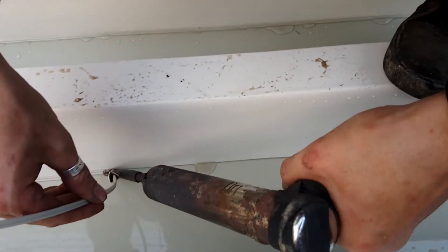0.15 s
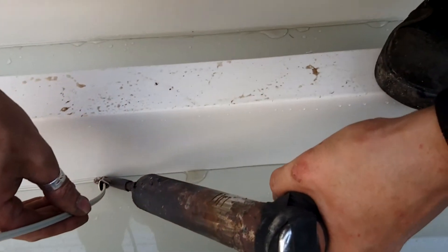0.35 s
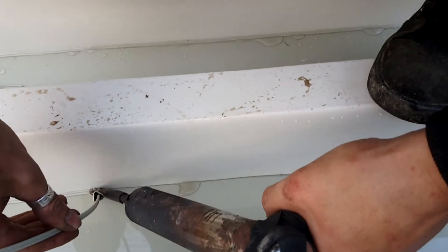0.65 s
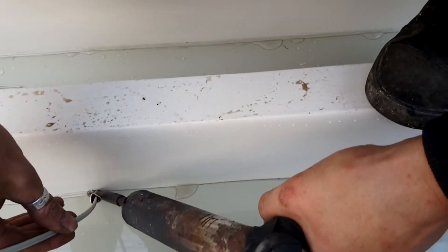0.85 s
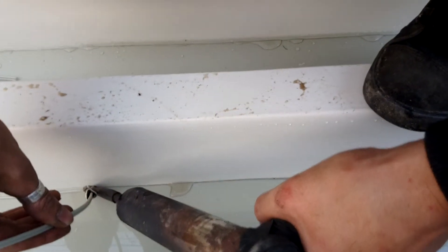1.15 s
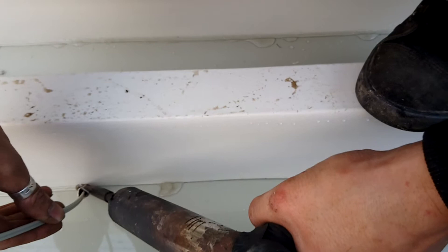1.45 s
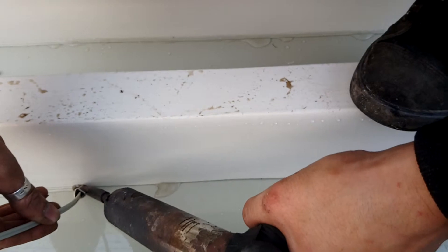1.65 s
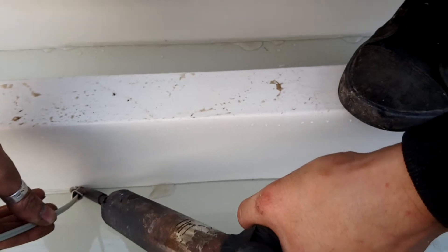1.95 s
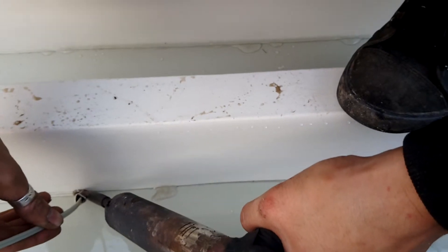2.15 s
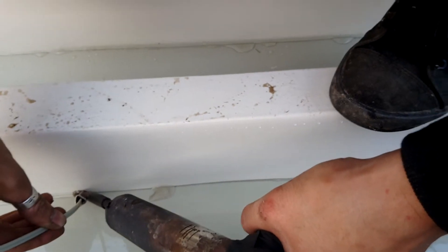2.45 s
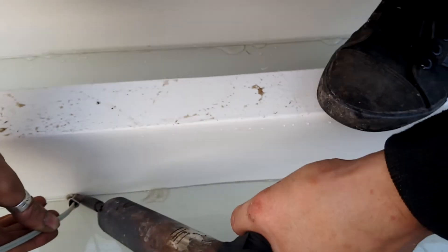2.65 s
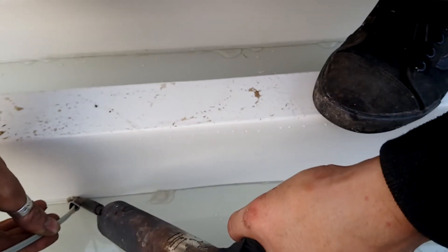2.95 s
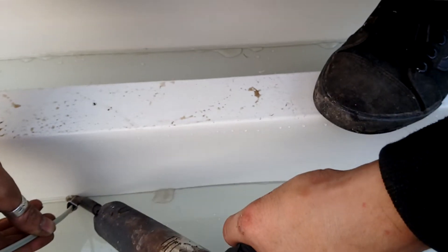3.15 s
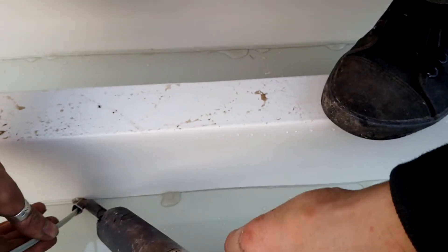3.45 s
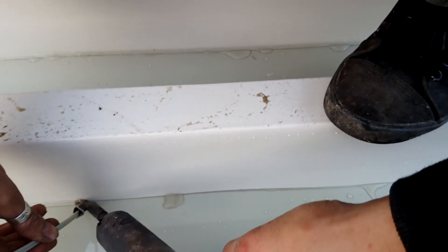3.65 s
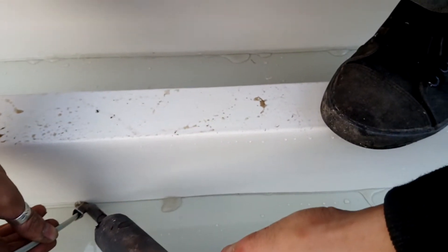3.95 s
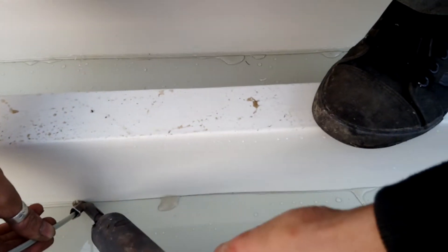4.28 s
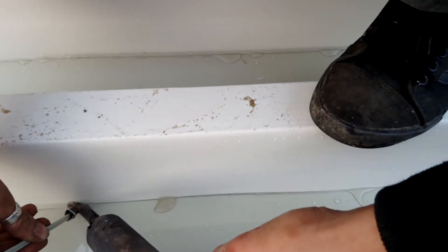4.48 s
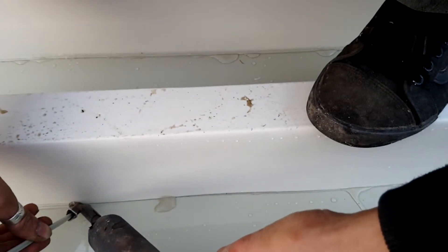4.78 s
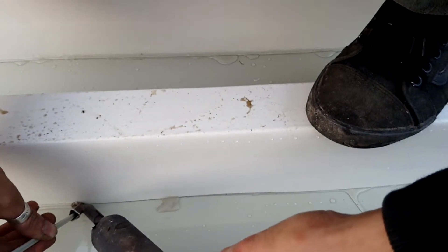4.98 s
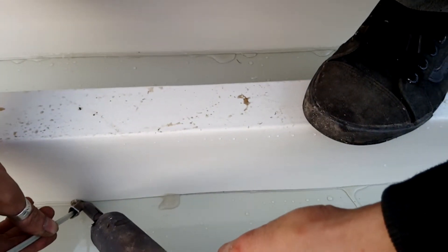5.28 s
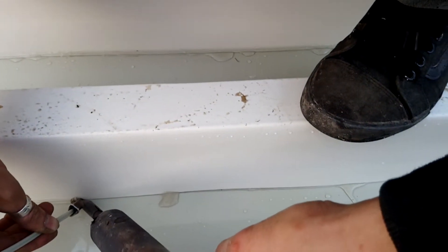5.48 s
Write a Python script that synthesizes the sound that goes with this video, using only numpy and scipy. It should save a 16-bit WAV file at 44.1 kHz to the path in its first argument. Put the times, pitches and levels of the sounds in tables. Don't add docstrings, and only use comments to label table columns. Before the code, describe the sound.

A hot-air welding gun blows a constant, bright, resonant hiss into a plastic corner, close and leaning left. Behind it a low air-supply rumble fills the workshop, with a blower hum strongest near one second. Soft dull knocks sound far off early and again near the end; brief low puffs of air touch the handheld camera midway. The stereo sound is slightly grainy, its extreme top cut.

```python
import sys
import numpy as np
from scipy import signal
from scipy.io import wavfile
from scipy.ndimage import uniform_filter1d

SR = 44100
rng = np.random.default_rng(int(sys.argv[2]) if len(sys.argv) > 2 else 0)


def amp(db):
    return 10 ** (np.asarray(db, float) / 20)


def write(x):
    x = np.atleast_2d(x).T
    wavfile.write(sys.argv[1], SR, np.round(np.clip(x, -1, 1) * 32767).astype(np.int16))


N = 247842


def at_hz(points, hz):
    table = np.array(points)
    return np.interp(np.log(hz + 1), np.log(table[:, 0]), table[:, 1])


def rumble():
    # (frequency [Hz], level [dB per Hz])
    colour = [(12, -50), (20, -17), (43, -18), (87, -7), (204, -2.5), (301, -3.5), (753, -8.5),
              (1020, -12.5), (1150, -13.5), (1500, -44), (2530, -120)]
    # (frequency [Hz], correlation [-1 to 1])
    likeness = [(30, .97), (70, 1), (130, 0.97), (290, 0.98), (500, 0.82), (800, 0.26), (1000, -0.2)]
    # (frequency [Hz], width [Hz], level [dB])
    duct = [(120, 11, 5.5), (158, 12, 2), (208.9, 6.3, 8.5), (289.4, 20, 5.5), (357, 5.9, 3.5),
            (411, 39, 3)]
    hz, _, z = signal.stft(rng.standard_normal((2, N)), SR, nperseg=8192)
    hz = hz[:, None]
    alike = np.clip(at_hz(likeness, hz), -1, 1)
    mid = np.sqrt(1 + alike) * z[0]
    side = np.sqrt(1 - alike) * z[1]
    colour_db = at_hz(colour, hz)
    for centre_hz, width_hz, db in duct:
        colour_db = colour_db + db / (1 + ((hz - centre_hz) / width_hz) ** 2)
    pair = np.array([mid + side, mid - side]) * amp(colour_db) * (hz < 1150)
    x = signal.istft(pair, SR, nperseg=8192)[1][:, :N]
    return amp(-36.82) * x / np.sqrt(np.mean(x ** 2))


def motor():
    turns_per_s = 48.78
    # (multiple of the turning rate, level [dB])
    partials = [(6, -60), (7, -57), (11, -62), (13, -61), (14, -65), (15, -62), (17, -63)]
    # (time [s], level [dB])
    hum_swell = [
        (0, -4.5),
        (.4, 4),
        (.8, 5),
        (1.25, 3.5),
        (1.5, 2),
        (3, -5.5),
        (4.5, -3),
        (5.62, -8),
    ]
    t, out = np.arange(N) / SR, np.zeros((2, N))
    swell_db = np.interp(t, *np.transpose(hum_swell))
    for k, db in partials:
        waver = np.interp(t, np.linspace(0, t[-1], num=24), rng.standard_normal(24))
        port_phase = max(k - 6, 0) * 0.2 * np.array([[0], [1]])
        phase = rng.uniform(0, 2 * np.pi) + port_phase + 0.36 * waver
        level = amp(db + 6.5 + swell_db + 2.5 * waver)
        out += level * np.sin(2 * np.pi * k * turns_per_s * t + phase)
    return out


def knocks():
    rise_s, t60_s, ring_width_hz = 0.048, 0.53, 40
    # (time [s], level [dB], pitch of the loudest part [Hz])
    blows = [
        (.3, -38.5, 604),
        (.65, -47.5, 700),
        (1.06, -46.5, 650),
        (1.55, -37.5, 526),
        (2.2, -36.5, 483),
        (4.98, -38, 530),
        (5.27, -38, 650),
        (5.56, -44, 550),
    ]
    # (frequency [Hz], level [dB])
    shop_modes = [(340, -2), (450, -1), (520, 3.5), (580, 1), (640, -3), (700, -15), (770, 1.5), (840, 1.5),
                  (900, 2), (970, -10), (1040, -3), (1120, -6)]
    t, out = np.arange(N) / SR, np.zeros((2, N))
    r = np.exp(-np.pi * ring_width_hz / SR)
    for hz, mode_db in shop_modes:
        swell = 1e-9
        for at, db, top_hz in blows:
            age = np.clip(t - at, 0, 1)
            tilt_db = -9.5 * np.log2(hz / top_hz) ** 2 + 2.2 * rng.standard_normal()
            decay = amp(db + tilt_db - 60 * age / t60_s)
            swell = swell + decay * np.minimum(age / rise_s, 1) * (age < 1)
        noise = rng.standard_normal((2, N))
        noise[1] = -0.1 * noise[0] + 1.08 * noise[1]
        ring = [1, -2 * r * np.cos(2 * np.pi * hz / SR), r * r]
        out += amp(mode_db + 24.5) * signal.lfilter([1 - r, 0, r - 1], ring, noise * swell)
    return out * amp([[-1.5], [1.5]])


def buffet():
    # (time [s], length [s], level [dB])
    puff_table = [
        (2.62, 0.18, -51),
        (2.997, 0.71, -57),
        (5.08, .4, -74),
    ]
    t = np.arange(N) / SR
    band = signal.butter(2, [35, 120], "band", fs=SR, output="sos")
    low = signal.sosfilt(band, rng.standard_normal((2, N)))
    level = amp(-70)
    for at, length, db in puff_table:
        level = level + amp(db) * np.sin(np.pi * np.clip((t - at) / length, 0, 1))
    return level * low / low.std()


def spectrum(x):
    hz, s, z = signal.stft(x, SR, nperseg=1024, noverlap=768)
    return hz[:, None], s, z


def wave(z):
    x = signal.istft(z, SR, nperseg=1024, noverlap=768)[1][:, :N]
    return x / np.sqrt(np.mean(x ** 2))


def patches(shape, bins, steps):
    field = rng.standard_normal(shape)
    for _ in range(2):
        field = uniform_filter1d(field, size=bins, axis=-2)
        field = uniform_filter1d(field, size=steps, axis=-1)
    return field / field.std()


def walls(echoes, hz, travel):
    total = 1
    for start_ms, end_ms, db in echoes:
        lag_ms = start_ms + (end_ms - start_ms) * travel
        total = total + amp(db) * np.exp(-2j * np.pi * hz * lag_ms / 1000)
    return total


def poses(s):
    turn_s, turn_takes_s = (1.13, 3.1), (0.15, 0.55)
    first, second = [(1 + np.tanh((s - at) / takes)) / 2 for at, takes in zip(turn_s, turn_takes_s)]
    return np.array([1 - first, first - second, second])


def jet():
    # (time [s], level [dB])
    flow = [
        (0.0, -23),
        (1.2, -22),
        (1.86, -23),
        (5.53, -23),
        (5.62, -23.5),
    ]
    # (frequency [Hz], level [dB per Hz])
    near_colour = [(1000, -41.5), (1250, -26), (1700, -34.5), (2200, -23.5), (2500, -26), (3300, -21.5),
                   (4500, -12), (5600, -18), (6700, -14), (7900, -29), (10000, -28.5), (11800, -35),
                   (13900, -42.5), (14700, -29.5), (15500, -30.5)]
    # (frequency [Hz], level [dB])
    shadow = [(900, 1), (1700, 0.5), (2200, 1.5), (2900, 4.5), (3500, 1.25), (4600, -5.5), (5600, -2),
              (6700, -12.5), (7600, -5.5), (8100, -13), (9000, -19.5), (11000, -19), (13900, -27),
              (15000, -19)]
    # (lag at start [ms], lag at end [ms], level [dB])
    near_echoes = [(1.3, 1.06, -22), (1.6, 2.07, -23), (2.5, 3.0, -20.5), (4.3, 4.7, -23)]
    far_echoes = [(.9, 1.3, -19), (2.05, 1.65, -16.5), (2.5, 1.9, -16), (3.7, 2.3, -16)]
    # (frequency [Hz], share [0 to 1])
    common_share = [(1000, 0.097), (1300, 0.4), (1900, 0.27), (2800, .9), (4000, 0.55), (5500, 0.46),
                    (7000, 0.25), (8500, .35), (15000, .1)]
    port_lag = (0.31, .326, .331)
    # (frequency [Hz], phase [radians])
    bend = [(1950, .3), (2300, -1.0), (2700, 0.63), (4600, 0.28), (4900, -0.84), (5250, 0.58),
            (6800, -0.55), (9000, -1)]
    # (frequency [Hz], width [Hz], near level [dB], far level [dB])
    first_pose = [(2340, 250, 3, 3), (2970, 450, -4, -4), (3590, 120, 5, 5), (3980, 120, -2.5, 1.5),
                  (4310, 140, -4.5, -2.5), (5246, 84, 11.5, 8.5), (6460, 400, 1, 0), (12200, 260, -13.5, 1),
                  (13500, 300, -2, 2)]
    second_pose = [(2265, 80, -3, -6), (2920, 120, 2, 2), (3690, 161, 2, 3.5), (4000, 100, -2, -1),
                   (4845, 120, 5.5, 4.5), (5180, 130, -2.5, -1), (11470, 310, -11.5, -4),
                   (8400, 130, -1.5, -2)]
    third_pose = [(3050, 134, 6, 6.5), (3337, 110, 7.5, 4), (3700, 100, -1, -4.5), (4175, 120, 7, 2.5),
                  (4540, 85, -4, 1.5), (4840, 150, 7, -2), (5420, 100, -4, -4), (5460, 380, -3.5, 1),
                  (8370, 160, 2, -10), (10880, 820, -7.5, -2.5), (12700, 690, 1, 4.5)]
    before_third = [(6080, 160, 0.68, 5.2), (6700, 120, 3.2, 0.55)]
    all_poses = [(6300, 1200, 0.97, -3), (13750, 390, -1.5, -1)]
    treble_hz, sink_per_s = 7800, 0.0027
    near_treble_db, far_treble_db = (-0.9, 0.6, 0.44), (1, 1, -0.5)

    hz, s, (common, stray) = spectrum(rng.standard_normal((2, N)))
    travel, pose = s / s[-1], poses(s)
    treble = hz > treble_hz
    near_db = at_hz(near_colour, hz) + treble * np.dot(near_treble_db, pose)
    far_db = at_hz(near_colour, hz) + at_hz(shadow, hz) + treble * np.dot(far_treble_db, pose)
    corners = (first_pose, second_pose, third_pose, before_third, all_poses)
    for table, alive in zip(corners, (*pose, 1 - pose[2], 1)):
        for start_hz, width_hz, near_bump_db, far_bump_db in table:
            centre_hz = start_hz * (1 - sink_per_s * s)
            bump = alive / (1 + ((hz - centre_hz) / width_hz) ** 2)
            near_db = near_db + near_bump_db * bump
            far_db = far_db + far_bump_db * bump

    sway_db = at_hz([(2000, 0.4), (7000, 0.96), (9000, 1.8), (12000, 2.5)], hz)
    sway = patches((2,) + common.shape, bins=3, steps=45) * sway_db
    flutter_db = at_hz([(2000, 0.33), (7000, 0.61), (12000, 0.81)], hz)
    flutter = patches(common.shape, bins=60, steps=4) * flutter_db

    alike = np.clip(at_hz(common_share, hz), 0, 1)
    late = np.exp(-1j * (2 * np.pi * hz * np.dot(port_lag, pose) / 1000 + at_hz(bend, hz)))
    near = common * walls(near_echoes, hz, travel) * amp(near_db + sway[0] + flutter)
    far = np.sqrt(alike) * common * late * walls(far_echoes, hz, travel)
    far = (far + np.sqrt(1 - alike) * stray) * amp(far_db + sway[1] + flutter)
    pair = wave(np.array([near, far]) * (hz > 950))
    flow_db = np.interp(np.arange(N) / SR, *np.transpose(flow))
    return pair * amp(flow_db + 4.0)


def scene():
    return rumble() + motor() + knocks() + buffet() + jet()


def starve(x):
    # (frequency [Hz], step [dB])
    step_first = [(1250, -14), (1650, 1.5), (2200, 0), (2700, -11), (5700, -16), (8000, -8), (11500, 4.5),
                  (14500, 2)]
    step_second = [(2300, -17), (2800, 2.5), (3300, -14), (5700, -14), (6900, 1), (8200, 5.5), (10000, 8),
                   (15400, 7.5)]
    block, grid, wander_db = 1024, 802, 4.0
    n, k, count = np.arange(2 * block), np.arange(block), N // block + 2
    window = np.sin(np.pi * (n + 0.5) / 2 / block)[:, None]
    basis = np.cos(np.pi / block * np.outer(n + 0.5 + block / 2, k + 0.5)) * window
    basis = basis.astype(np.float32)
    padded = np.pad(x, ((0, 0), (2 * block - grid, 3 * block)))
    blocks = padded[:, np.arange(count)[:, None] * block + n]
    lines = np.tensordot(blocks.astype(np.float32), basis, axes=1)

    hz = (k + 0.5) * SR / 2 / block
    low = hz < 5000
    lines = np.where(low, [lines[0] + lines[1], lines[0] - lines[1]], lines)
    power = np.mean(lines ** 2, axis=1, keepdims=True)
    usual_low = np.sqrt(uniform_filter1d(power, size=45, axis=2))
    usual_high = np.sqrt(uniform_filter1d(power, size=90, axis=2))
    usual = np.where(low, usual_low, usual_high)

    band = np.where(low, k // 8, 40 + k // 24)
    wander = uniform_filter1d(rng.standard_normal((2, count, block)), size=3, axis=1)
    wander = wander[..., band] * np.sqrt(3)
    step_db = np.array([[at_hz(step_first, hz)], [at_hz(step_second, hz)]])
    step = 1e-9 + usual * amp(step_db + wander_db * wander)
    lines = np.sign(lines) * np.floor(abs(lines) / step + 0.4) * step

    lines = np.where(low, [(lines[0] + lines[1]) / 2, (lines[0] - lines[1]) / 2], lines)
    halves = np.tensordot(lines.astype(np.float32), basis.T, axes=1) * 2 / block
    halves = halves.reshape(2, count, 2, block)
    joined = (halves[:, 1:, 0] + halves[:, :-1, 1]).reshape(2, -1)
    return joined[:, block - grid:][:, :N]


def band_limit(x):
    return signal.sosfilt(signal.butter(12, 15850, fs=SR, output="sos"), x)


def record(dry):
    top_cut = signal.ellip(12, 0.5, 90, 15440, fs=SR, output="sos")
    mix = starve(signal.sosfilt(top_cut, dry))
    return band_limit(mix)


dry = scene()
out = record(dry)
write(out)
```